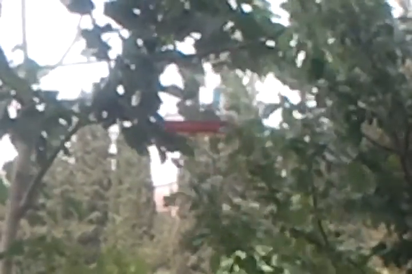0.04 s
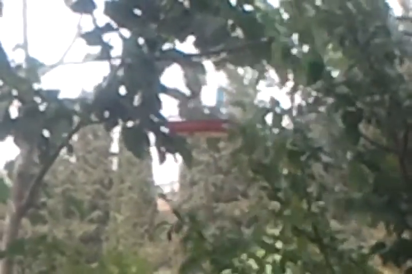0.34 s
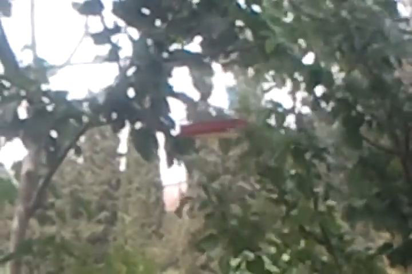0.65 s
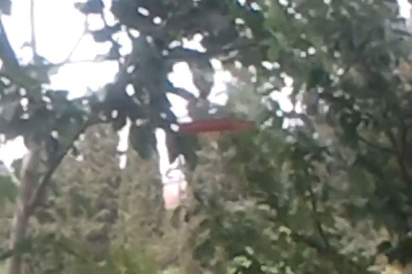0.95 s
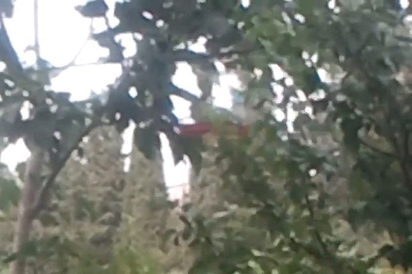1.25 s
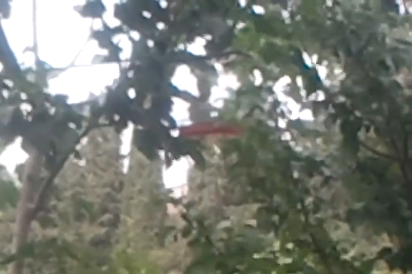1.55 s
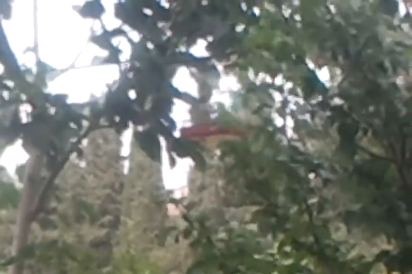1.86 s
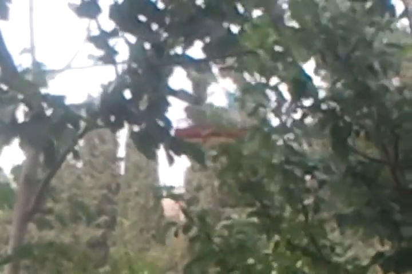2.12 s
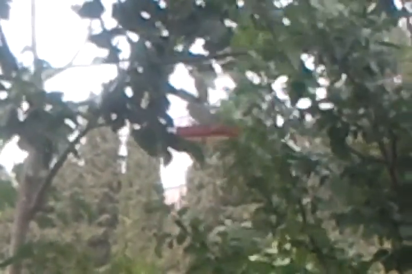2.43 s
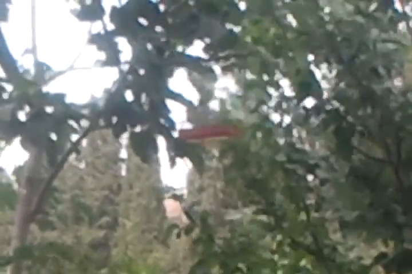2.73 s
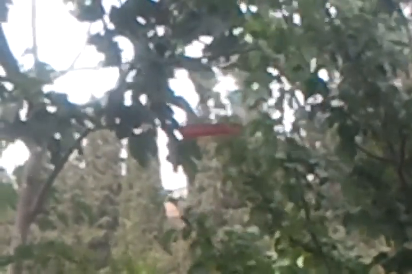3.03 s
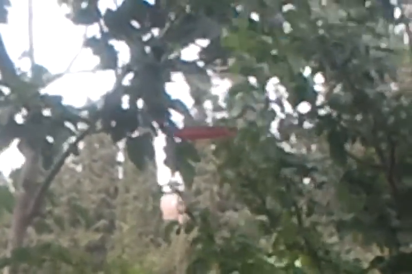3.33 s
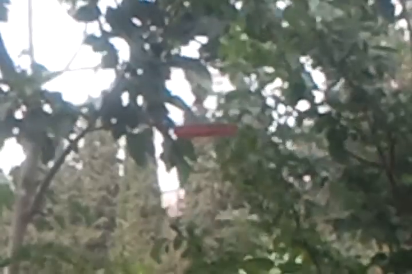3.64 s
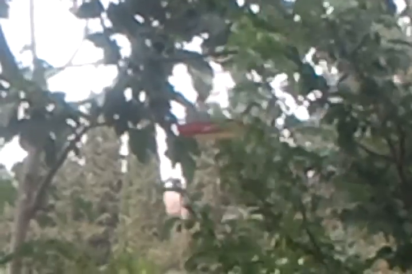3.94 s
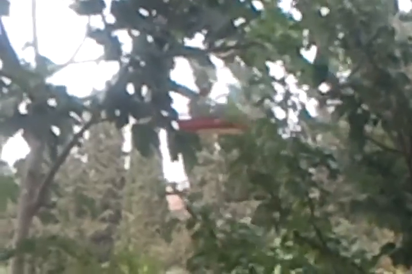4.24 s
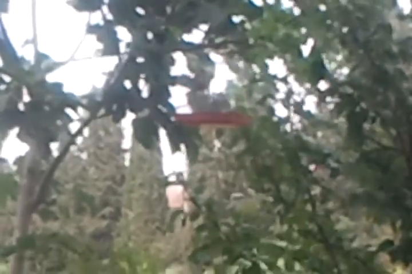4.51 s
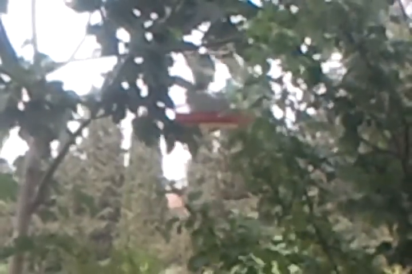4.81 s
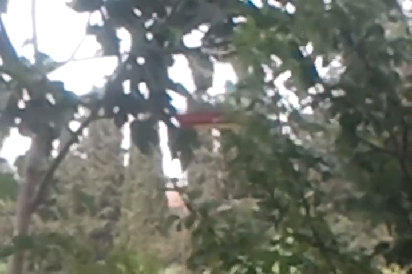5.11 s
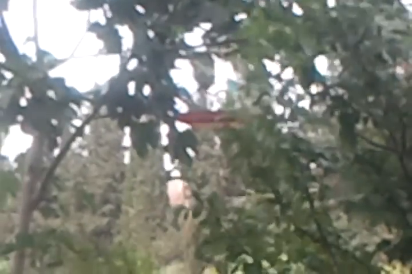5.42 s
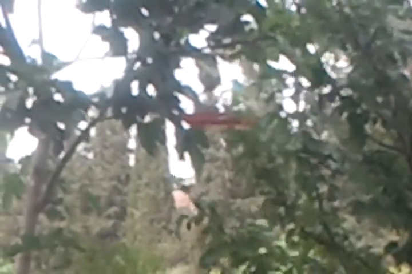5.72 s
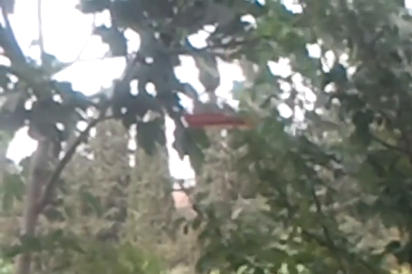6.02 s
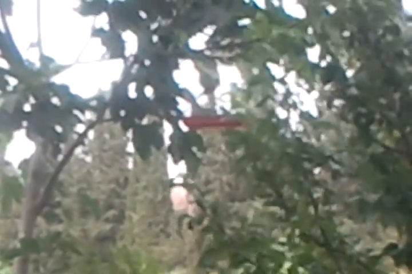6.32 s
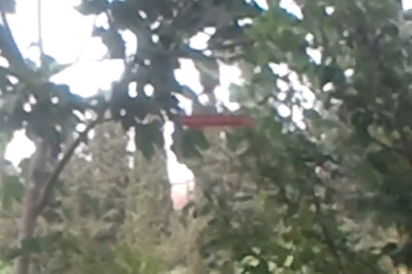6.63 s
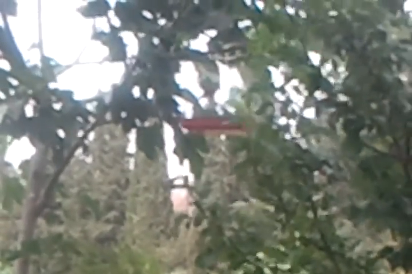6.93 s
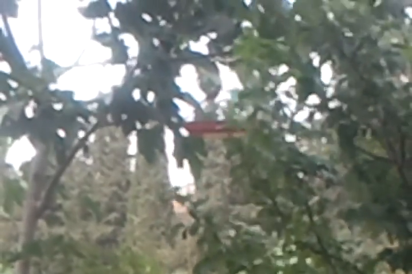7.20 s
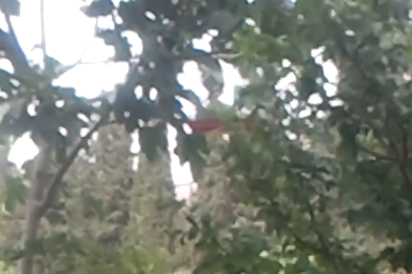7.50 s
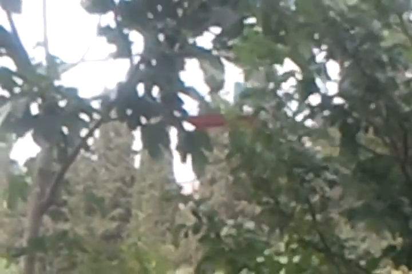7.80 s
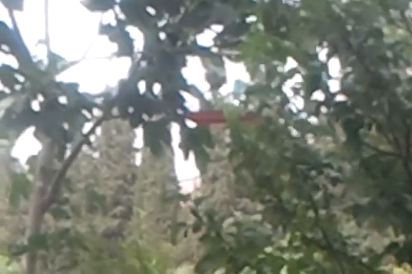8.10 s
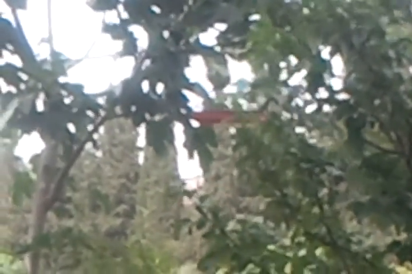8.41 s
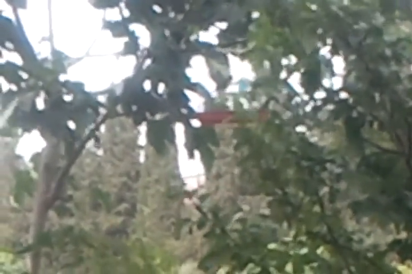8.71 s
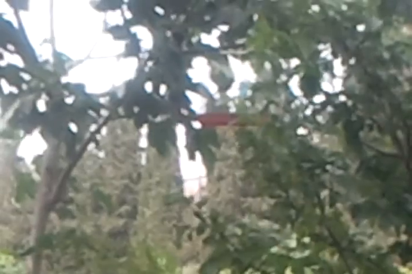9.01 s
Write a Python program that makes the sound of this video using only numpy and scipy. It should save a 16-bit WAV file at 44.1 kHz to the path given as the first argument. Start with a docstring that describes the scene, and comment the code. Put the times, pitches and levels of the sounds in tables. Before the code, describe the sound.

A songbird sings quick, varied whistles and trills outdoors, while gusts of wind rumble and thump on the microphone.

```python
"""A nightingale sings quick, varied whistles, sweeps and buzzes in a leafy garden. Each note is a nearly
pure tone from its syrinx, and the trees scatter a short tail after it. Thin falling calls repeat about
six times a second, a soft twitter comes and goes, and a far bird whistles low. Gusts push eddies
against the microphone, which rumble, flutter and thump over a soft outdoor hush."""
import sys
import numpy as np
from scipy import signal
from scipy.fft import rfft, irfft
from scipy.io import wavfile
from scipy.ndimage import uniform_filter1d

SR = 44100
rng = np.random.default_rng(int(sys.argv[2]) if len(sys.argv) > 2 else 0)


def transcribe(u):
    """Save the signal u as a 16-bit wav file named by the first command-line argument.

    u: samples, shape (n,) or (channels, n), limited to [-1, 1]; the rate is SR.
    q: integer samples, one column per channel.
    """
    v = np.clip(np.atleast_2d(u).T, -1, 1)
    q = np.round(v * 32767).astype(np.int16)
    wavfile.write(sys.argv[1], SR, q)


N = 403515
REFERENCE_DB = -28   # a lively wind: the level from which the growth of smaller eddies is counted


def from_db(db):
    """Decibels to amplitude."""
    return 10 ** (np.asarray(db) / 20)


def rms_one(x):
    """Scale a signal to rms 1."""
    return x / np.sqrt(np.mean(x ** 2) + 1e-20)


def add(track, start_s, sound):
    """Mix a sound into a track at a given time."""
    at = int(np.clip(start_s * SR, 0, N - 1))
    track[at:at + len(sound)] += sound[:N - at]


def drift(size, rate_hz):
    """A random modulator: ramps between up to 400 random values, then holds."""
    knots = rng.standard_normal(400)
    return np.interp(np.arange(size) / SR * rate_hz, np.arange(len(knots)), knots)


def bump(centre_s, length_s):
    """A bell-shaped swell of height 1."""
    return np.exp(-np.minimum((2 * (np.arange(N) / SR - centre_s) / length_s) ** 2, 40))


def coloured_noise(spectrum):
    """Noise at rms 1, shaped by points of (frequency [Hz], level [dB])."""
    hz, db = np.transpose(spectrum)
    bins = np.maximum(np.fft.rfftfreq(N, 1 / SR), 1)
    gain = from_db(np.interp(np.log(bins), np.log(hz), db)) * np.minimum(bins / hz[0], 1)
    return rms_one(irfft(rfft(rng.standard_normal(N)) * gain, N))


def hush(level_db=-50.5):
    """The garden's bed of soft, steady noise."""
    # colour of the hush (frequency [Hz], relative level [dB])
    spectrum = [(180, -2.5), (300, -0.5), (473, -2.5), (522, -1.5), (1020, -7), (2010, -9), (2710, -9.5),
                (4090, -12), (4990, -13.5), (5750, -14), (6630, -12.5), (7860, -13.5), (8320, -4),
                (8930, -32.5), (11600, -76.5), (19600, -120)]
    return from_db(level_db) * coloured_noise(spectrum)


def eddies(spectrum, span_s):
    """Turbulence whose strength stays even over spans longer than an eddy."""
    noise = coloured_noise(spectrum)
    size = int(span_s * SR)
    local_power = uniform_filter1d(uniform_filter1d(noise ** 2, size), size)
    return noise / np.sqrt(local_power + 1e-6)


def wind_strength(flutter_db=-36, flutter_growth=1.85, lull_s=0.1, lull_db=-8.5):
    """Rumble and flutter envelopes in dB: gusts add to the breeze, lulls duck it; flutter moves more."""
    # the breeze under the gusts (time [s], rumble level [dB])
    breeze = [(0.0, -49), (0.4, -38.5), (1.1, -35), (1.55, -38), (1.9, -33.5), (2.3, -25.5), (3.1, -25.5),
              (3.5, -42), (4.1, -30), (4.45, -36), (4.65, -29.5), (5.25, -37), (5.4, -34), (5.95, -31),
              (6.9, -38.5), (7.9, -35.5), (8.4, -40), (9.15, -42)]
    # gusts (peak time [s], length [s], rumble level [dB], flutter relative to rumble [dB])
    gusts = [(0.433, 0.039, -35.5, -17.6), (0.631, 0.069, -28.5, -15), (0.861, 0.098, -27.5, -17.5),
             (1.279, 0.089, -21.5, -12), (1.639, 0.032, -29, -8.5), (1.87, 0.17, -28.5, -1.5),
             (2.259, 0.15, -23.5, -3), (2.452, 0.07, -24, 0.5), (2.647, 0.14, -30.5, 5.5),
             (2.852, 0.12, -29, 9.5), (2.997, 0.044, -28, 4.5), (3.17, 0.037, -20.5, 1),
             (3.339, 0.086, -28.5, -3.5), (3.445, 0.074, -20.5, -12.5), (3.646, 0.17, -23.5, -7.5),
             (3.799, 0.06, -28, -4.5), (3.924, 0.073, -25, 2.5), (4.6, 0.068, -29, 2),
             (4.694, 0.043, -24, -1.5), (4.807, 0.14, -18, -9), (5.018, 0.11, -22.5, -2),
             (5.123, 0.14, -22, -3.8), (5.221, 0.047, -20, -1.2), (5.301, 0.038, -29.5, 6),
             (5.467, 0.061, -23.9, -8.5), (5.604, 0.18, -30, 0.5), (5.807, 0.076, -26.5, -6),
             (6.205, 0.085, -25.5, -7), (6.322, 0.1, -27.5, -9), (6.717, 0.058, -26.5, -14.5),
             (6.932, 0.28, -30.4, -3.5), (7.216, 0.09, -24, -4.5), (7.475, 0.027, -26.5, -4.5),
             (7.746, 0.26, -28, -8.5), (7.99, 0.1, -30, -11), (8.112, 0.06, -30, -22),
             (9.064, 0.057, -35.5, -18.5)]
    # moments when the air falls still (time [s])
    lulls = [0.711, 3.729, 4.762, 5.75, 5.956, 6.531]
    breeze_db = np.interp(np.arange(N) / SR, *np.transpose(breeze))
    rumble_power = from_db(breeze_db) ** 2
    flutter_power = from_db(flutter_db + flutter_growth * (breeze_db - REFERENCE_DB)) ** 2
    for peak, length, db, relative_db in gusts:
        swell = bump(peak, length)
        rumble_power += from_db(db) ** 2 * swell
        flutter_power += from_db(db + relative_db) ** 2 * swell ** flutter_growth
    dip_db = lull_db * sum(bump(centre, lull_s) for centre in lulls)
    return 10 * np.log10(rumble_power) + dip_db, 10 * np.log10(flutter_power) + flutter_growth * dip_db


def wind(calm_hz=85, calm_db=-42, deep_db=1.5, rumble_wander_db=1.5, flutter_wander_db=2.0,
         fine_db=-55, fine_growth=1.9, flicker_db=1.5):
    """Large eddies rumble on the microphone, deepest in calm air; gusts shed small ones that flutter."""
    # colours of large, small and finest eddies (frequency [Hz], relative level [dB])
    rumble_spectrum = [(12, -12), (22, -2), (40, -1), (70, 0), (100, -1), (130, -8), (200, -28), (600, -80)]
    flutter_spectrum = [(60, -16), (95, -5), (130, 0), (170, -2.5), (230, -8), (320, -19), (450, -31),
                        (700, -44), (1500, -65)]
    fine_spectrum = [(120, -24.5), (200, 2.5), (260, 4), (340, -9.5), (450, -15), (650, -33.5), (1400, -55)]
    rumble_db, flutter_db = wind_strength()
    wander = drift(N, 35)
    flicker = coloured_noise([(10, 1), (60, 2.5), (200, -37.5)])
    lowpass = signal.butter(3, calm_hz, fs=SR, output="sos")
    deep = from_db(deep_db) * signal.sosfilt(lowpass, eddies(rumble_spectrum, span_s=0.14))
    lively = np.clip((rumble_db - calm_db) / (REFERENCE_DB - calm_db), 0, 1)
    large = np.sqrt(1 - lively) * deep + np.sqrt(lively) * eddies(rumble_spectrum, span_s=0.13)
    rumble = from_db(rumble_db + rumble_wander_db * wander) * large
    flutter = from_db(flutter_db) * eddies(flutter_spectrum, span_s=0.08)
    # each size of eddy grows faster than the next larger one; growth is in dB per dB
    fine_envelope = from_db(fine_db + fine_growth * (flutter_db - REFERENCE_DB) + flicker_db * flicker)
    fine = fine_envelope * eddies(fine_spectrum, span_s=0.083)
    return rumble + from_db(flutter_wander_db * wander) * (flutter + fine)


def buffets():
    """An eddy passing the microphone port thumps: one push and pull of pressure."""
    # single eddies (time [s], peak level [dB], centre frequency [Hz])
    thumps = [(2.102, -17.5, 119), (2.247, -8.5, 85.5), (2.43, -16.5, 119), (2.59, -14, 106),
              (2.795, -10, 104), (2.892, -14, 109), (3.12, -16.5, 124), (3.167, -27, 212),
              (2.837, -25, 242), (4.601, -16.5, 161), (4.96, -16, 129), (5.275, -16.5, 101)]
    out = np.zeros(N)
    t = np.arange(SR // 20) / SR - 1 / 40
    for centre, db, hz in thumps:
        phase = 2 * np.pi * hz * t
        push_pull = phase * np.exp((1 - phase ** 2) / 2)
        add(out, centre + t[0], from_db(db) * rng.choice([-1, 1]) * push_pull)
    return out


def foliage(x, near_t60, far_t60, far_db, sway_s=.00006):
    """Leaves and trunks return a quick cloud of echoes and a longer one; swaying blurs their pitch."""
    t = np.arange(SR) / SR
    near, far = rng.standard_normal((2, SR))
    echoes = near * from_db(-60 * t / near_t60) + far * from_db(far_db - 60 * t / far_t60)
    echoes *= 1 - np.exp(-(t / 0.01) ** 2)   # the first echoes need time to return
    tail = signal.fftconvolve(x, echoes / np.sqrt(np.sum(echoes ** 2)))[:N]
    sway = sway_s * SR * drift(N, 40)
    return np.interp(np.arange(N) + sway, np.arange(N), tail)


def nearby_leaves(x, spread_s):
    """Early reflections off the leaves around the perch ruffle each note."""
    t = np.arange(SR // 10) / SR
    echoes = rng.standard_normal(len(t)) * t * np.exp(-t / spread_s)
    return signal.fftconvolve(x, echoes / np.sqrt(np.sum(echoes ** 2)))[:N]


def glide(length_s, first_hz, middle_hz, last_hz):
    """A pitch bend along a parabola through three points."""
    progress = np.linspace(0, 1, int(length_s * SR))
    return np.polyval(np.polyfit([0, .5, 1], [first_hz, middle_hz, last_hz], 2), progress)


def syrinx(pitch, crest, roundness, waver, shimmer_db):
    """A bird's nearly pure, slightly unsteady tone; it peaks at the fraction `crest` of its length."""
    size = len(pitch)
    arc = np.interp(np.linspace(0, 1, size), [0, crest, 1], [0, .5, 1])
    swell = np.abs(np.sin(np.pi * arc)) ** roundness
    shimmer = from_db(shimmer_db * drift(size, 157))
    phase = 2 * np.pi * np.cumsum(pitch * (1 + waver * drift(size, 294.6))) / SR
    return rms_one(swell * shimmer) * np.sin(phase)


def far_bird(echo_db=0):
    """Low fluted notes from far off, as much echo as direct sound."""
    # whistles (start [s], length [s], first pitch [Hz], middle pitch [Hz], last pitch [Hz], level [dB])
    notes = [(.46, .096, 2200, 2256, 2350, -49), (.62, 0.098, 2018, 2073, 2110, -56),
             (2.823, .045, 1760, 1847, 2180, -43.5), (3.04, 0.044, 2120, 2160, 2180, -47.5),
             (3.205, 0.16, 2006, 2198, 2173, -45), (2.893, 0.034, 2520, 2500, 2420, -45),
             (3.609, 0.22, 1668, 1683, 1664, -50.5), (3.743, 0.098, 1906, 1854, 1926, -45),
             (4.42, 0.13, 2254, 2200, 2114, -51.5), (7.115, 0.075, 1627, 2090, 1950, -52)]
    out = np.zeros(N)
    for start, length, first, middle, last, db in notes:
        pitch = glide(length, first, middle, last)
        note = syrinx(pitch, crest=0.38, roundness=0.35, waver=0.0038, shimmer_db=3.0)
        add(out, start, from_db(db) * note)
    return out + from_db(echo_db) * foliage(out, near_t60=0.41, far_t60=1.3, far_db=-8)


def twitter(flicks_per_s=70, flick_s=0.011, spread_db=6.4, echo_db=-1):
    """Tiny downward flicks at random moments and tunings, blurred by the trees."""
    # spells of scratchy twitter (start [s], length [s], lowest flick level [dB])
    spells = [(0.0, 0.43, -54), (2.273, 0.35, -60), (4.298, 0.3, -51), (4.551, 0.43, -57),
              (7.454, 0.063, -55.5), (8.215, 0.35, -54.5)]
    out = np.zeros(N)
    fall = np.linspace(7300, 4900, int(flick_s * SR))
    for start, length, db in spells:
        for when, tune, strength in rng.random((int(length * flicks_per_s), 3)):
            pitch = fall * (.9 + 0.37 * tune)
            flick = np.hanning(len(pitch)) * np.sin(2 * np.pi * np.cumsum(pitch) / SR)
            add(out, start + when * length, from_db(db + spread_db * strength) * flick)
    return out + from_db(echo_db) * foliage(out, near_t60=0.14, far_t60=.5, far_db=-10)


def thin_calls(hook_hz=650, hook_s=0.0037, wobble=.008, direct_db=4.5, echo_db=-2.5):
    """Thin calls that hook in steeply from above, then slide down through the high treble."""
    # falling calls (start [s], length [s], relative level [dB])
    calls = [(0.026, 0.085, -50.5), (0.203, 0.065, -44), (0.376, 0.099, -50.5), (0.53, 0.098, -54),
             (0.73, 0.077, -45), (0.867, 0.1, -49.5), (1.039, 0.084, -50.5), (1.19, 0.097, -50.0),
             (1.385, 0.079, -49.5), (1.604, 0.064, -52), (1.748, 0.09, -50.5), (1.926, 0.069, -46),
             (2.093, 0.076, -47.5), (2.279, 0.083, -46), (2.484, 0.085, -48), (2.616, 0.11, -51.5),
             (2.791, 0.073, -46), (2.953, 0.073, -47.5), (3.113, 0.075, -48), (3.266, 0.087, -47.5),
             (3.439, 0.08, -47.0), (3.625, 0.063, -48), (3.831, 0.07, -49), (4.013, 0.11, -51),
             (4.225, 0.087, -48), (4.368, 0.115, -56), (4.555, 0.066, -43), (4.705, 0.072, -48),
             (4.869, 0.08, -48.5), (5.042, 0.084, -47.5), (5.262, 0.075, -47.5), (5.503, 0.066, -43.5),
             (5.66, 0.097, -52.5), (5.82, 0.097, -54), (6.003, 0.11, -56), (6.176, 0.074, -50.5),
             (6.362, 0.064, -54), (6.635, 0.065, -50.0), (6.809, 0.091, -52.5), (7.209, 0.067, -45),
             (7.364, 0.075, -59), (7.567, 0.081, -53.5), (8.076, 0.085, -54.5), (8.402, 0.08, -50.5),
             (8.887, 0.11, -62), (9.075, 0.1, -55)]
    # the slide they all share (first pitch [Hz], middle pitch [Hz], last pitch [Hz])
    slide = (7310, 6667, 5925)
    out = np.zeros(N)
    for start, length, db in calls:
        pitch = glide(length, *slide)
        pitch *= 1 + wobble * drift(len(pitch), 45)
        pitch += hook_hz * np.exp(-np.arange(len(pitch)) / SR / hook_s)
        note = syrinx(pitch, crest=0.54, roundness=0.44, waver=.007, shimmer_db=2.2)
        add(out, start, from_db(db) * note)
    tail = foliage(out, near_t60=0.05, far_t60=0.47, far_db=-11)
    return from_db(direct_db) * out + from_db(echo_db) * tail


def nightingale_buzzes(swing_rate_hz=300, tremolo=0.64, echo_db=-1):
    """Pitch and level swing unevenly, hundreds of times a second, spreading the note into a rasp."""
    # buzzes (start [s], length [s], first pitch [Hz], last pitch [Hz], level [dB], pitch swing [Hz])
    buzzes = [(0.512, .05, 7740, 7620, -41.5, 250), (1.507, 0.055, 5470, 7400, -37, 160),
              (1.513, 0.04, 4320, 5100, -44, 160), (2.028, 0.039, 3100, 3390, -38.5, 450),
              (2.185, .08, 6300, 6380, -41.5, 650), (2.31, 0.032, 3580, 4070, -38.5, 350),
              (2.421, .13, 3890, 4440, -55, 450), (3.038, .07, 5200, 3870, -38.5, 550),
              (3.218, 0.077, 5690, 5520, -40, 260), (3.242, 0.087, 4210, 4040, -43, 453),
              (4.35, .05, 4640, 3440, -37.5, 300), (4.444, 0.067, 3570, 3730, -36.5, 240),
              (4.59, 0.042, 4400, 3730, -42.5, 450), (4.721, 0.1, 3553, 3414, -38.5, 263),
              (5.084, 0.11, 3570, 3850, -38.5, 226), (6.13, 0.24, 7850, 7840, -48, 400),
              (6.717, 0.11, 3800, 3640, -44.5, 455), (6.842, 0.059, 3920, 2690, -44.5, 650),
              (6.907, 0.072, 5030, 3120, -39.5, 700), (6.99, 0.012, 6650, 6300, -41, 249),
              (7.004, .045, 6310, 6180, -35, 650), (7.049, 0.02, 2730, 2300, -44.5, 202),
              (7.255, 0.054, 3280, 3080, -47.5, 230)]
    out = np.zeros(N)
    for start, length, first, last, db, depth in buzzes:
        pitch = glide(length, first, (first + last) / 2, last)
        rate = swing_rate_hz * np.exp(.12 * rng.standard_normal() + .22 * drift(len(pitch), 350))
        cycle = 2 * np.pi * np.cumsum(rate) / SR
        pitch += depth * np.sin(cycle)
        note = syrinx(pitch, crest=0.5, roundness=0.31, waver=0.015, shimmer_db=4.5)
        add(out, start, from_db(db) * note * (1 + tremolo * np.cos(cycle)))
    return out + from_db(echo_db) * foliage(out, near_t60=0.31, far_t60=0.79, far_db=-15)


def nightingale_sweeps(first_half_share=.57, rasp=0.29, rasp_hz=600, ruffle_db=-6, echo_db=-6):
    """Brief, slightly raspy sweeps that start fast and ease off, sung from inside the leaves."""
    # sweeps up or down (start [s], length [s], first pitch [Hz], last pitch [Hz], level [dB])
    sweeps = [(.012, 0.021, 3040, 4070, -34), (.142, .016, 4140, 5380, -35.5),
              (.173, 0.02, 4210, 3070, -35.5), (.197, 0.0085, 3360, 4080, -33),
              (.324, 0.0097, 4900, 2930, -40), (.338, 0.035, 3036, 4080, -31.5),
              (.376, 0.014, 6340, 4570, -52), (.378, .016, 3490, 3050, -35.5),
              (.393, 0.012, 3420, 4320, -32.5), (.487, 0.015, 2200, 2950, -44),
              (.598, 0.012, 4500, 5140, -36), (1.106, 0.017, 2630, 2060, -44),
              (1.449, 0.018, 7700, 5780, -37), (1.985, 0.024, 2740, 3690, -37.5),
              (2.133, 0.011, 4340, 5220, -33), (2.416, 0.022, 4790, 3800, -35.5),
              (3.668, 0.026, 2960, 3930, -39), (3.694, .014, 3680, 2330, -45),
              (3.707, .012, 3900, 5740, -36.5), (3.778, .062, 2600, 5080, -42),
              (3.958, 0.024, 2710, 3780, -38), (4.006, .032, 3080, 5600, -35.5),
              (4.177, 0.024, 2930, 4040, -40.5), (4.964, 0.02, 2930, 3800, -35),
              (5.081, 0.0064, 4600, 5260, -26), (5.189, .016, 3010, 3920, -37),
              (5.312, 0.052, 8360, 7050, -41.5), (5.333, .02, 4300, 5340, -39),
              (5.885, 0.043, 8700, 7000, -42.5), (6.455, 0.015, 2700, 1500, -47),
              (6.611, 0.011, 2700, 1600, -41.5), (6.724, 0.021, 4600, 3650, -40),
              (6.846, 0.023, 3890, 2015, -33), (6.912, 0.026, 4020, 2150, -33.5),
              (7.244, 0.01, 4930, 3250, -42), (7.339, 0.013, 2740, 4230, -35),
              (7.453, .014, 2500, 2840, -41.5), (7.476, 0.026, 2520, 3920, -30.5),
              (7.601, 0.019, 2750, 3660, -36), (7.7, 0.012, 4900, 6700, -31),
              (7.865, 0.0093, 3670, 4490, -35.5), (8.782, .009, 4450, 6550, -42.5)]
    ticks = [(4.656 + k * .061, .01, 7110, 4550, -43) for k in range(5)]   # a run of steep falls
    out = np.zeros(N)
    for start, length, first, last, db in list(sweeps) + ticks:
        pitch = glide(length, first, first + first_half_share * (last - first), last)
        tremble = 1 + rasp * np.sin(2 * np.pi * (rasp_hz * np.arange(len(pitch)) / SR + rng.random()))
        note = syrinx(pitch, crest=0.65, roundness=0.51, waver=0.01, shimmer_db=3.0)
        add(out, start, from_db(db) * tremble * note)
    ruffle = from_db(ruffle_db) * nearby_leaves(out, spread_s=0.0095)
    return out + ruffle + from_db(echo_db) * foliage(out, near_t60=.25, far_t60=1.0, far_db=-12.5)


def nightingale_whistles(echo_db=-2.5):
    """Clear, bending notes that swell and fade alike, with a tail from the trees."""
    # whistles (start [s], length [s], first pitch [Hz], middle pitch [Hz], last pitch [Hz], level [dB])
    notes = [(0.079, 0.049, 3200, 2970, 2360, -36), (0.146, 0.055, 2416, 2577, 2380, -33.5),
             (0.225, 0.018, 6800, 5870, 5850, -42), (0.648, 0.016, 6470, 6310, 6400, -37.5),
             (0.682, 0.012, 6900, 6470, 6200, -39.5), (0.801, 0.076, 2930, 3160, 3040, -32.5),
             (0.898, 0.088, 2790, 2880, 3126, -36), (1.064, 0.046, 4160, 3747, 3500, -31),
             (1.136, 0.08, 3020, 2625, 2200, -38), (1.623, 0.055, 2740, 2840, 3250, -35.5),
             (1.728, 0.036, 3845, 3864, 4220, -34), (1.776, 0.068, 2470, 2045, 2540, -47),
             (1.799, 0.014, 3750, 3610, 3400, -31.5), (2.034, 0.05, 3740, 3385, 3100, -30.5),
             (2.168, 0.049, 3100, 3403, 3560, -29), (2.262, 0.023, 2830, 2780, 2970, -34.5),
             (2.353, 0.051, 5600, 5010, 5000, -30.5), (2.441, .024, 3800, 4230, 4080, -31),
             (2.523, 0.029, 4730, 4400, 3970, -33), (2.556, 0.077, 3114, 3046, 3024, -34),
             (2.649, 0.025, 2850, 2700, 2330, -38), (2.725, 0.06, 2970, 2720, 2210, -34.5),
             (2.922, 0.066, 3700, 3054, 2680, -35), (3.093, 0.03, 3225, 2853, 2680, -27),
             (3.101, 0.036, 3950, 3813, 3670, -33), (3.151, 0.04, 2707, 3056, 2990, -35),
             (3.279, 0.024, 3230, 2875, 2670, -28), (3.419, 0.035, 4240, 4040, 4060, -34),
             (3.465, 0.068, 3000, 2506, 2270, -39.5), (3.952, 0.066, 2680, 2382, 2236, -35.5),
             (4.032, 0.025, 5280, 5650, 5700, -40.5), (4.113, 0.051, 2190, 2290, 2240, -39),
             (6.443, 0.019, 2160, 2418, 2270, -31.5), (6.544, .048, 2560, 2650, 2680, -46),
             (6.593, .015, 2190, 2410, 2330, -28.5), (6.603, 0.04, 2830, 2905, 2870, -42),
             (6.701, 0.042, 3466, 3246, 3370, -34), (6.755, 0.075, 3500, 3350, 3200, -39),
             (6.772, 0.037, 4070, 4035, 3800, -41), (6.895, 0.028, 5230, 5520, 5240, -46),
             (7.318, 0.0626, 3870, 3520, 3440, -33.5), (7.704, 0.034, 3400, 3564, 3350, -37),
             (7.736, 0.048, 2550, 2855, 3090, -35.5), (7.779, 0.068, 3090, 3400, 3530, -30.5),
             (7.9, 0.063, 2754, 2460, 2400, -34.5), (7.96, 0.041, 2550, 2760, 2710, -36.5),
             (8.071, 0.088, 3510, 3240, 2977, -29.5), (8.226, 0.046, 3460, 3650, 3910, -33),
             (8.307, 0.031, 3470, 3267, 3250, -31.5), (8.476, 0.028, 2526, 2707, 2740, -35.5),
             (8.531, 0.062, 2710, 2680, 2560, -36.5), (8.663, 0.041, 2990, 3110, 3156, -31.5),
             (8.785, 0.037, 6400, 6330, 6460, -36.5), (8.879, 0.056, 4320, 4130, 4010, -31.5),
             (8.933, 0.039, 4160, 4434, 4430, -32.5), (9.118, .03, 3560, 3350, 2950, -35.5)]
    out = np.zeros(N)
    for start, length, first, middle, last, db in notes:
        pitch = glide(length, first, middle, last)
        note = syrinx(pitch, crest=0.62, roundness=.38, waver=.007, shimmer_db=1.8)
        add(out, start, from_db(db) * note)
    return out + from_db(echo_db) * foliage(out, near_t60=0.29, far_t60=0.67, far_db=-7)


def scene(direct_db=-2, leaves_db=-9.5):
    """A mono mix: birds heard directly and off the leaves, the hush, and wind on the microphone."""
    nightingale = nightingale_whistles() + nightingale_sweeps() + nightingale_buzzes()
    birds = nightingale + thin_calls() + far_bird() + twitter()
    birds = from_db(direct_db) * birds + from_db(leaves_db) * nearby_leaves(birds, spread_s=0.0043)
    return (birds + hush() + wind() + buffets())[None]


def record(dry, sampling_hz=16000, mirror_db=-14, cutoff_hz=8850):
    """A low sampling rate mirrors the highest notes about half that rate; then the top is cut."""
    band = signal.sosfilt(signal.butter(14, 7900, fs=SR, output="sos"), dry)
    mirrored = band * 2 * np.cos(2 * np.pi * sampling_hz * np.arange(N) / SR)
    aliased = band + from_db(mirror_db) * mirrored
    softened = signal.sosfilt(signal.butter(14, 8000, fs=SR, output="sos"), aliased)
    return signal.sosfilt(signal.ellip(10, .1, 80, cutoff_hz, fs=SR, output="sos"), softened)


dry = scene()
out = record(dry)
transcribe(out)
```